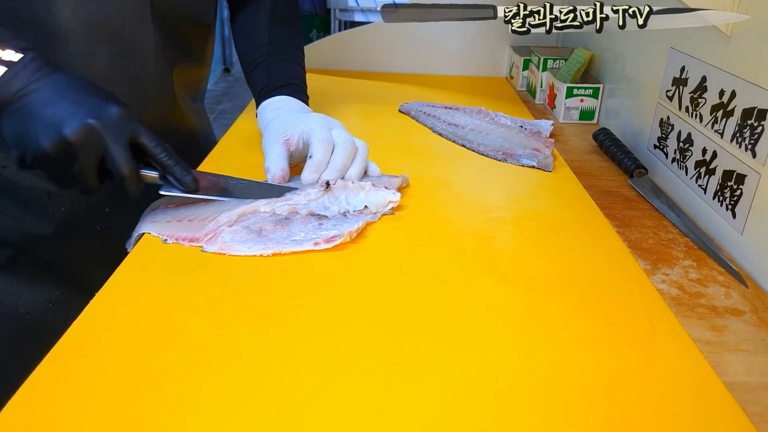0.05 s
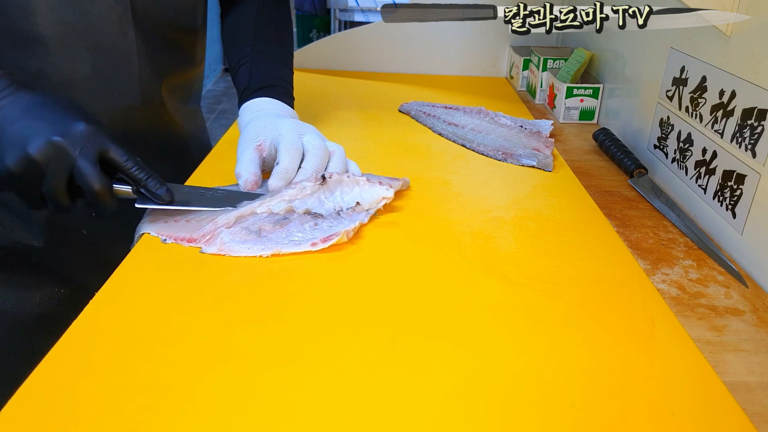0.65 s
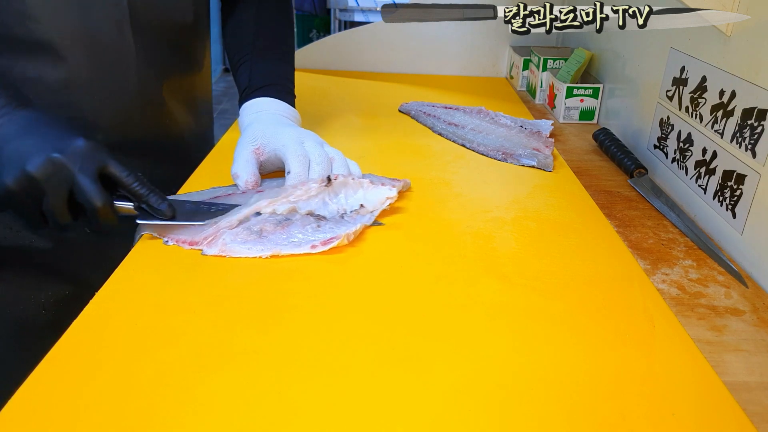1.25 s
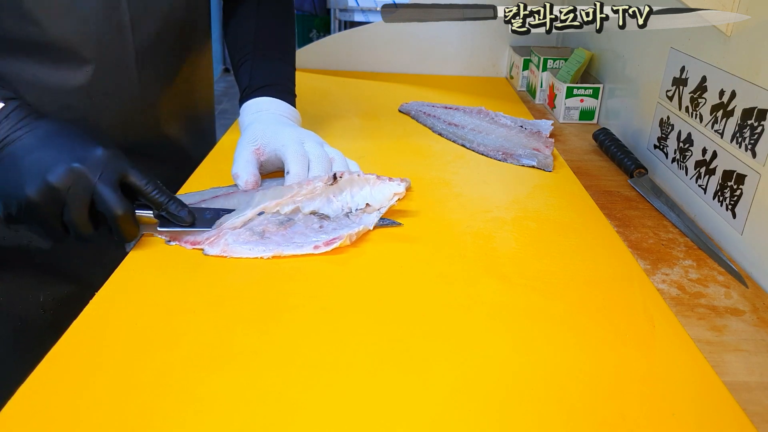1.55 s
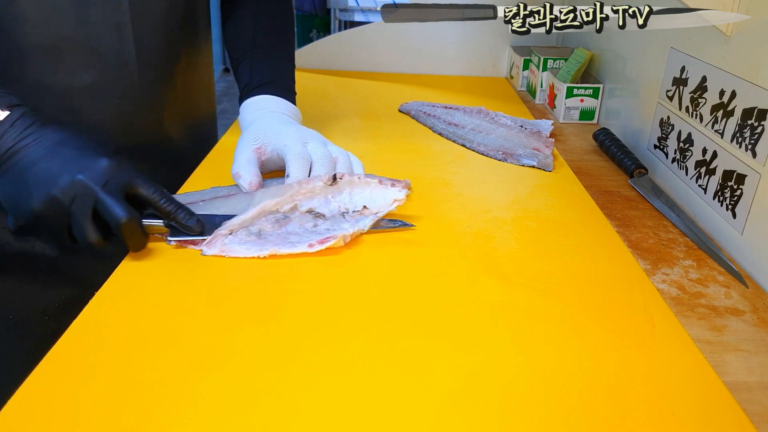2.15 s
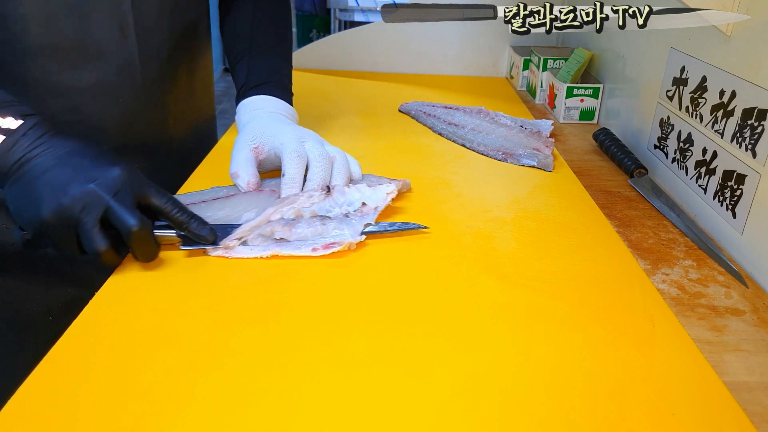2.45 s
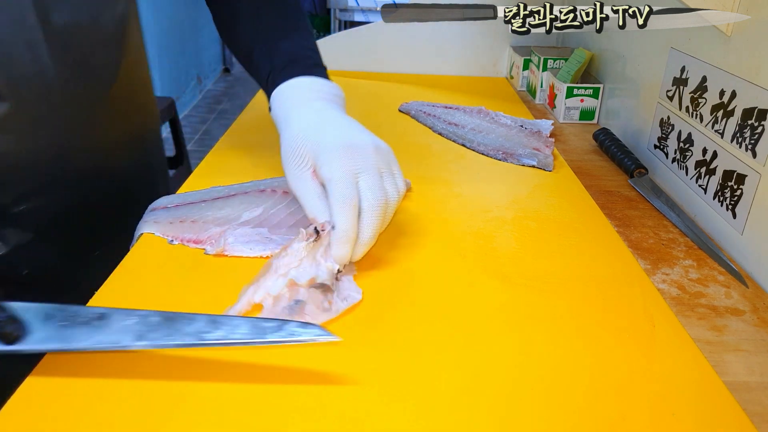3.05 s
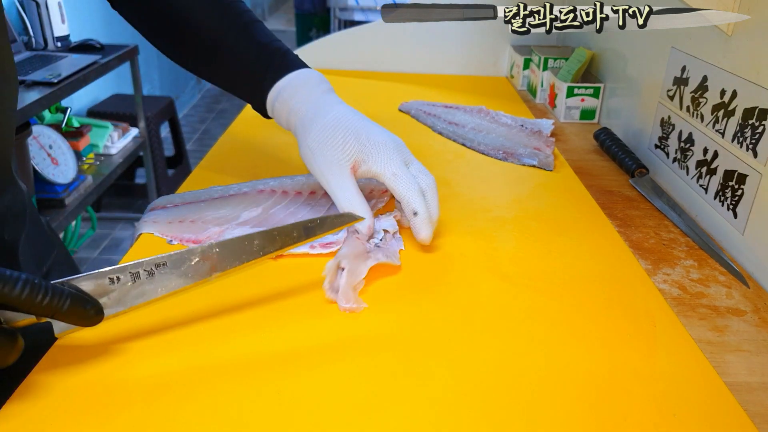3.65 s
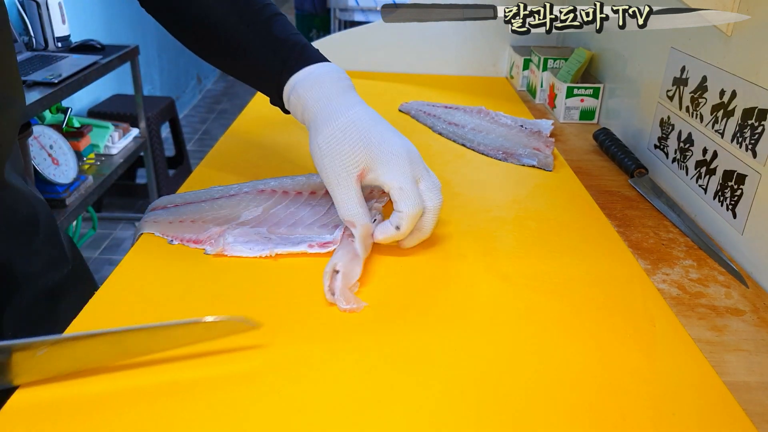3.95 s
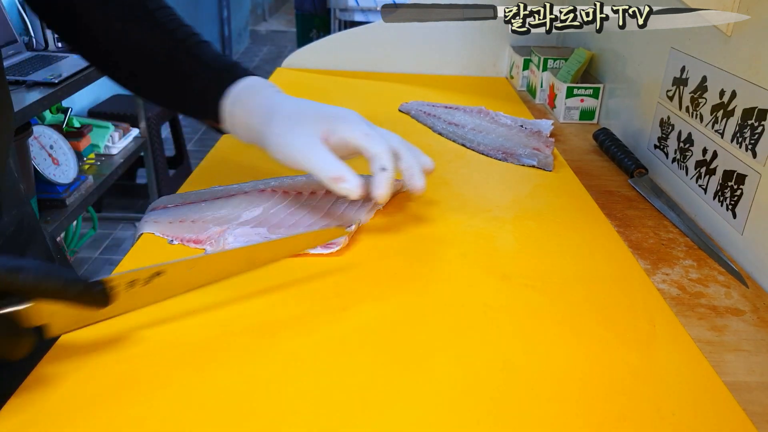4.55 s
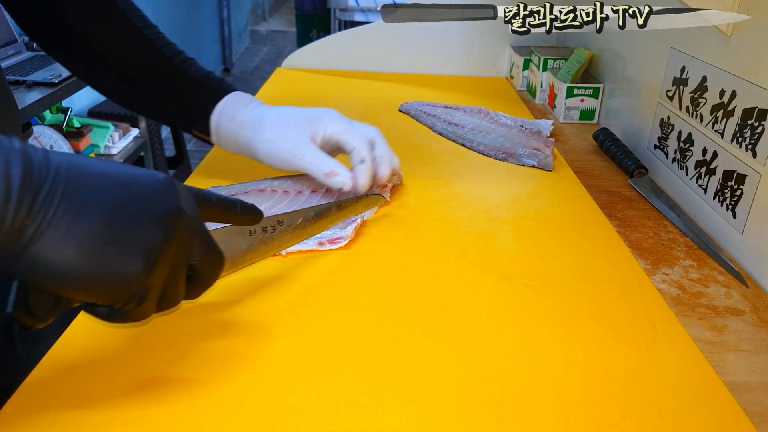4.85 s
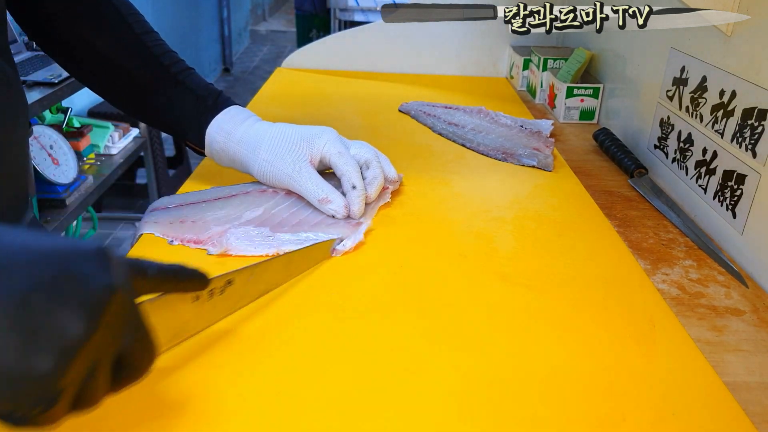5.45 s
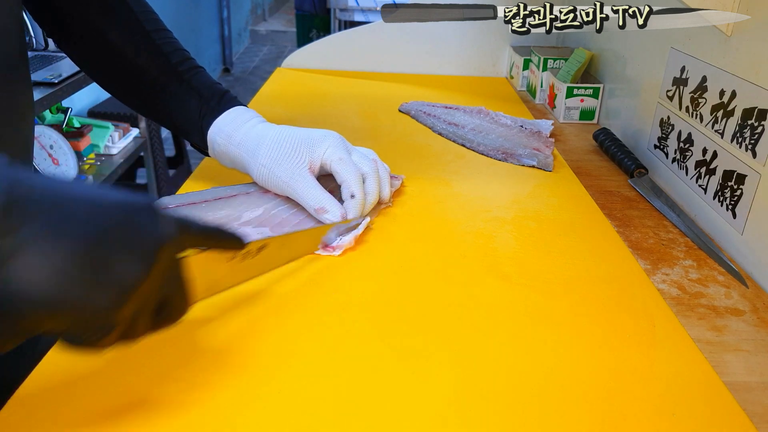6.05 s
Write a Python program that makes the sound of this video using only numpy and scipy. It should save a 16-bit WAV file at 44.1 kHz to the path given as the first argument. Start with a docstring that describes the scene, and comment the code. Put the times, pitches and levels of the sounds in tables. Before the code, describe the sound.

In a small, hard-walled shop, a cooling unit hums and blows steadily. Close by, a knife snaps through fish skin, clinks on rib bones and tears fibres with a faint wet rasp. The flesh squelches in little pops, and the cutting builds to a brief flurry of clinks and cracks. Then the fillet rubs dully on a plastic cutting board, and the blade knocks on the board twice, the second time softer.

```python
"""A fish fillet is trimmed on a thick plastic cutting board in a small, hard-walled shop.
A cooling unit hums and blows from start to end. Right away skin snaps, the blade clinks on rib bones
and fibres tear with a wet rasp. From about one second the flesh squelches as air pockets pop.
The cutting is busiest near 2.6 s, where the fan's rumble also peaks; then flesh starts to rub on the
board. Near the end the edge knocks on the board twice. Each knife sound has a short echo."""
import sys
import numpy as np
from scipy import signal
from scipy.fft import rfft, irfft
from scipy.io import wavfile

SR = 44100
rng = np.random.default_rng(int(sys.argv[2]) if len(sys.argv) > 2 else 0)


def store_wav(level_fs):
    """Save 16-bit WAV to argv[1]."""
    pcm = np.round(np.clip(np.atleast_2d(level_fs), -1, 1) * 32767)
    wavfile.write(sys.argv[1], SR, pcm.T.astype(np.int16))


N = 278271
TIME = np.arange(N) / SR  # clock for the whole scene [s]
RING = np.arange(SR // 2) / SR  # clock for one short sound [s]


def undb(db):
    """Turn decibels into a number to multiply by."""
    return 10 ** (np.asarray(db) / 20)


def unit(x):
    """Scale a sound to an average strength (rms) of 1."""
    return x / np.sqrt(np.mean(np.abs(x) ** 2))


def over_hz(points, size):
    """Join a table's (frequency, value) points into a curve over a whole spectrum."""
    hz, value = np.transpose(points)
    bin_hz = np.arange(size // 2 + 1) * SR / size
    return np.interp(np.log(bin_hz + 1), np.log(hz), value)


def colour(x, points):
    """Shape a sound's bass and treble with a (frequency, level) table, at strength 1."""
    size = x.shape[-1]
    return unit(irfft(rfft(x) * undb(over_hz(points, size)), size))


def pan(db):
    """Left and right gains: positive dB moves a sound left, negative right."""
    return undb(np.array([[1], [-1]]) * db / 2)


def fade(t60):
    """Die away by 60 dB in t60 seconds, the 'fade time' of the tables."""
    return np.exp(-np.log(1000) * RING / max(t60, 1e-3))


def swell(s, half):
    """A smooth rise and fall that peaks at time s and has a half length in seconds."""
    return np.exp(-((TIME - s) / half) ** 2 / 2)


def add(track, s, sound):
    """Mix a sound into a track from time s."""
    start = int(s * SR)
    track[..., start:start + sound.shape[-1]] += sound[..., :N - start]


def flutter(width_hz):
    """A slow random wobble; its complex values can shake both a tone's level and its phase."""
    hz = np.arange(N // 2 + 1) * SR / N
    real, imag = irfft(rfft(rng.standard_normal((2, N))) / (1 + (hz / width_hz) ** 2), N)
    return unit(real + 1j * imag)


def ring(modes, pitch):
    """A struck object's own tones (modes); neighbours swing opposite ways, so the ring builds briefly."""
    return sum((-1) ** k * undb(db) * fade(t60) * np.sin(2 * np.pi * f * pitch * RING)
               for k, (f, db, t60) in enumerate(modes))


def crack(spectrum, t60):
    """A burst of noise from the knife's edge."""
    return colour(rng.standard_normal((2, len(RING))), spectrum) * fade(t60)


def room(x, wet_db, low_fade_s=0.24, treble_fade_s=0.14):
    """The walls add a short echo, different left and right, whose treble dies first."""
    noise = rng.standard_normal((2, len(RING)))
    low = signal.sosfilt(signal.butter(1, 2000, fs=SR, output="sos"), noise)
    tail = low * fade(low_fade_s) + (noise - low) * fade(treble_fade_s)
    tail *= 1 - np.exp(-RING / 0.00085)  # soft start
    direct = x * np.ones((2, 1))
    echo = signal.fftconvolve(direct, unit(tail) / np.sqrt(len(RING)), axes=1)[:, :N]
    return direct + undb(wet_db) * echo


def compressor(hum_hz=120.1, flutter_hz=9, waver_db=1):
    """The cooling unit hums at twice the mains rate, with unsteady overtones and thin whines."""
    # tones of the hum: (multiple of hum_hz, level above the hum [dB], flutter share, pan [dB])
    hum_tones = [(1, 1.5, 0.14, -0.6), (2, -14, 0.51, -6.5), (3, -31.5, 0.96, -10), (4, -31.5, 0.93, 5)]
    # faint whines of the unit: (pitch [Hz], level [dB])
    whines = [(964, -65), (1445, -68), (2803, -69), (3435, -70), (4858, -79), (8965, -81), (9070, -82),
              (10078, -80), (10739, -77)]
    out = np.zeros((2, N))
    hum_db = -27 + waver_db * flutter(1.2).real
    for multiple, db, share, pan_db in hum_tones:
        steady = np.sqrt(max(1 - share ** 2, 0))
        tone = (steady + share * flutter(flutter_hz)) * np.exp(2j * np.pi * multiple * hum_hz * TIME)
        out += np.sqrt(2) * undb(hum_db + db) * pan(pan_db) * tone.real
    for hz, db in whines:
        phase = rng.uniform(0, np.pi, (2, 1))  # reflections put left and right out of step
        tone = flutter(9.1) * np.exp(2j * np.pi * hz * TIME) * np.exp(1j * phase)
        out += np.sqrt(2) * undb(db) * tone.real
    return out


def fan(rumble_db=-37.5, swell_db=5.5, air_db=-41.5, surge_db=1.2):
    """The fan blows rushing air over a rumble that swells once; only the bass is alike on both sides."""
    # low rumble of the fan: (frequency [Hz], level [dB])
    rumble_colour = [(20, -14), (40, -4.5), (68, 5.5), (100, 4), (135, 7), (165, 3), (200, -1), (255, -5.5),
                     (290, -6), (420, -28.5), (1500, -92)]
    # rush of the air: (frequency [Hz], level [dB])
    air_colour = [(60, -18), (150, 3.5), (330, 4), (400, -1), (465, 2.5), (700, -1.5), (1100, -3),
                  (1600, -5.5), (2400, -8), (3400, -9.5), (4100, -15), (7800, -24.5), (8800, -22),
                  (11500, -24), (15500, -31)]
    # how alike left and right are: (frequency [Hz], likeness [-1 to 1])
    likeness = [(100, 0.98), (200, 0.82), (350, 0.41), (700, 0.36), (1300, -0.36), (3000, 0.15),
                (12000, -0.17)]
    # the fan stands to the right: (frequency [Hz], pan [dB])
    fan_pan = [(100, -0.5), (330, -0.5), (500, -1), (1700, -2), (2600, -6), (3400, -7), (4500, -1.5),
               (9000, .5), (14000, 0)]
    noise = rng.standard_normal((2, 2, N))
    rumble = colour(noise[0], rumble_colour) * undb(rumble_db + swell_db * swell(2.57, half=1.87))
    air = colour(noise[1], air_colour) * undb(air_db + surge_db * flutter(18).real)
    shared, opposed = rfft(rumble + air)
    alike = np.clip(over_hz(likeness, N), -.999, .999)
    shared *= np.sqrt((1 + alike) / 2)
    opposed *= np.sqrt((1 - alike) / 2)
    left_right = np.array([shared + opposed, shared - opposed])
    return irfft(left_right * pan(over_hz(fan_pan, N)), N)


def snaps():
    """Short, bright cracks of the knife: skin snapping, and a tick as the edge first meets the board."""
    # cracks at the edge: (time [s], level [dB], fade time [s], added treble tilt [dB per octave])
    cracks = [(0.031, -42.5, 0.14, 13), (1.884, -43, .08, 2), (2.595, -30, 0.031, -2),
              (2.6046, -29.5, 0.1, -2), (3.5295, -50, .02, 2.5), (5.2097, -50, .03, 3),
              (5.4743, -36.5, .028, 5), (5.5087, -33.5, .018, -2.5)]
    # a crack before its tilt: (frequency [Hz], level [dB])
    snap_colour = [(600, -14), (2000, -4), (5000, -2), (7000, -6), (9000, 0), (11500, 0), (13500, -5),
                   (15500, -11)]
    out = np.zeros((2, N))
    for s, db, t60, tilt_db in cracks:
        spectrum = [(hz, level + tilt_db * np.log2(hz)) for hz, level in snap_colour]
        add(out, s, undb(db) * crack(spectrum, t60))
    return room(out, wet_db=-22)


def clinks(rib_gap_s=.0123, rib_hz=2840, scatter=0.037):
    """The blade rings briefly at each bone; along the ribs the clinks come evenly and grow louder."""
    # tones of the blade, damped by flesh: (multiple of the clink's pitch, level [dB], fade time [s])
    blade = [(.92, -2.5, 0.038), (1, 0.5, 0.058), (1.07, -1.5, 0.03), (1.3, -12.5, 0.05),
             (3.17, -10, 0.036)]
    # the blade slips off a single bone: (time [s], level [dB], pitch [Hz])
    bones = [(0.032, -48, 3400), (.698, -50, 3950), (2.39, -51, 3680), (2.5818, -35, 3370),
             (2.6033, -29.5, 3420), (5.4743, -45.5, 3920)]
    # the edge skips along the ribs: (start [s], end [s], first level [dB], growth [dB per s])
    rib_runs = [(.078, 0.115, -48, 30), (2.534, 2.576, -44, 130)]
    out = np.zeros(N)
    for s, db, hz in bones:
        add(out, s, undb(db) * ring(blade, hz))
    for start, end, db, growth_db in rib_runs:
        for s in np.arange(start, end, rib_gap_s):
            hz = rib_hz * (1 + scatter * rng.standard_normal())
            # a soft touch on a thin rib leaves the highest tone silent
            add(out, s, undb(db + growth_db * (s - start)) * ring(blade[:-1], hz))
    return room(out * pan(-13), wet_db=-4)


def slicing(tears_per_s=7000, grain_db=3):
    """Fibres tear in many tiny clicks: a fine wet hiss, and a coarser rasp where the edge rides on bone."""
    # knife strokes: (peak time [s], level [dB], half length [s], rasp above the hiss [dB])
    strokes = [(.06, -57.5, 0.037, 6.5), (1.153, -61.5, .032, 4), (1.923, -60.5, .048, 6.5),
               (2.11, -57.5, 0.047, 4), (2.368, -54.5, 0.025, 7.5), (2.562, -56.5, 0.05, 7.5),
               (2.619, -44, 0.015, 7), (2.85, -65.5, 0.24, 13.5), (4.256, -70, 0.013, 17),
               (5.5, -59, .04, 3.5), (6.153, -56.5, 0.023, 5)]
    # wet hiss of a stroke: (frequency [Hz], level [dB])
    hiss_colour = [(2000, -16), (5000, -6), (7500, -6), (9500, 0), (12000, -2), (15500, -16)]
    # coarse rasp of a stroke: (frequency [Hz], level [dB])
    rasp_colour = [(300, 10.5), (1100, -5.5), (1700, 0), (2300, 7.5), (3300, 6), (4500, 0), (7000, -9.5),
                   (11000, -24), (15500, -40)]
    fine, coarse = np.zeros((2, N))
    for s, db, half, rasp_db in strokes:
        force = undb(db) * swell(s, half)
        fine += force
        coarse += force * undb(rasp_db)
    tears = rng.random(N) < tears_per_s / SR
    sizes = undb(grain_db * np.minimum(rng.exponential(size=N), 4))
    clicks = tears * sizes * rng.standard_normal((2, 2, N))
    hiss = fine * colour(clicks[0], hiss_colour)
    rasp = coarse * colour(clicks[1], rasp_colour) * pan(-7.5)
    return room(hiss + rasp, wet_db=0.5)


def squelches(count=24, cluster_s=.06, spread=0.21, after_db=-6, fade_db_per_s=150, cycles=16):
    """An air pocket pops in the wet flesh, and smaller pops of scattered pitch follow."""
    # air pockets in the flesh: (time [s], level [dB], pitch [Hz])
    pockets = [(.956, -34, 1050), (1.587, -31, 1110), (2.073, -31.5, 1040), (2.106, -34.5, 1200),
               (2.354, -30.5, 990), (2.378, -33, 1040), (2.533, -32.5, 1050), (2.5823, -28, 1060),
               (2.782, -31.5, 1200), (2.809, -31, 1250), (3.804, -31.5, 1070)]
    out = np.zeros(N)
    pop = lambda hz: fade(cycles / hz) * np.sin(2 * np.pi * hz * RING)
    for s, db, hz in pockets:
        add(out, s, undb(db) * pop(hz))
        delays = cluster_s * rng.random(count)
        detunes = spread * rng.standard_normal(count)
        for delay, detune in zip(delays, detunes):
            add(out, s + delay, undb(db + after_db - fade_db_per_s * delay) * pop(hz * np.exp(detune)))
    return room(out, wet_db=-9)


def rubs(width=0.14, half_s=0.03):
    """Wet flesh sticks and slips on the board, and once the fish lands on it: a dull creak, made of a narrow
    band of noise."""
    # flesh rubbing under the blade, and at 2.83 s the fish landing on the board: (peak time [s], level [dB],
    # pitch [Hz])
    creaks = [(2.83, -45, 593), (3.6, -48, 645), (3.677, -48, 615), (5.282, -47, 610), (5.362, -45, 556),
              (6.04, -48, 810)]
    out = np.zeros((2, N))
    for s, db, hz in creaks:
        band_hz = [hz * (1 - width / 2), hz * (1 + width / 2)]
        resonance = signal.butter(2, band_hz, "band", fs=SR, output="sos")
        slips = signal.sosfilt(resonance, rng.standard_normal(N))
        out += undb(db) * unit(slips) * swell(s, half_s)
    return room(out, wet_db=-32)


def knocks(pivot_hz=400, bite_fade_s=0.067, settle_s=0.036, settle_db=-9):
    """The edge bites into the board with a dull crack, makes it ring and settles with a softer crack."""
    # tones of the board on its table: (base pitch [Hz], level [dB], fade time [s])
    board = [(142, 3.5, 0.095), (207, 4, 0.11), (262, -1.5, 0.11), (333, 0.5, 0.067), (457, 3, 0.089),
             (521, 1, 0.089), (554, -1.5, .08), (646, -13, .06), (854, -14, .054), (966, -14.5, 0.073),
             (1270, -14.5, .06), (1460, -22, .084)]
    # the edge hits the board: (time [s], ring level [dB], contact time [ms],
    # stiffness [factor on the pitches], tilt around pivot_hz [dB per octave], crack level [dB])
    hits = [(5.5099, -16.5, 0.72, 1.02, -0.5, -30), (5.9864, -26.5, 0.67, 1.17, 0, -40)]
    # crack of the edge entering the board: (frequency [Hz], level [dB])
    bite = [(400, -10), (900, 2), (1350, -3), (1900, -15), (3000, -7), (5000, -26), (12000, -43)]
    out = np.zeros((2, N))
    for s, db, contact_ms, stiffness, tilt_db, crack_db in hits:
        modes = [(hz, level + tilt_db * np.log2(hz / pivot_hz), t60) for hz, level, t60 in board]
        span = contact_ms * SR / 1000  # a longer push leaves only the low tones
        push = np.sin(np.pi * np.minimum(np.arange(int(span) + 2) / span, 1))
        add(out, s, undb(db) * np.convolve(ring(modes, stiffness), push / push.sum()))
        add(out, s, undb(crack_db) * crack(bite, bite_fade_s))
        add(out, s + settle_s, undb(crack_db + settle_db) * crack(bite, bite_fade_s))
    return room(out * pan(-2.8), wet_db=-10)


def scene():
    """Knife work over the running cooling unit."""
    return compressor() + fan() + knocks() + snaps() + clinks() + slicing() + squelches() + rubs()


def record(dry, top_hz=15600):
    """A steep filter removes the highest treble."""
    return signal.sosfilt(signal.ellip(10, .2, 80, top_hz, fs=SR, output="sos"), dry)


dry = scene()
out = record(dry)
store_wav(out)
```